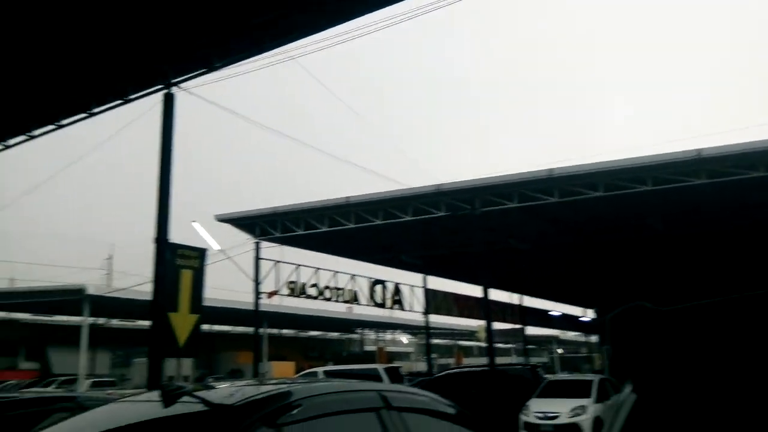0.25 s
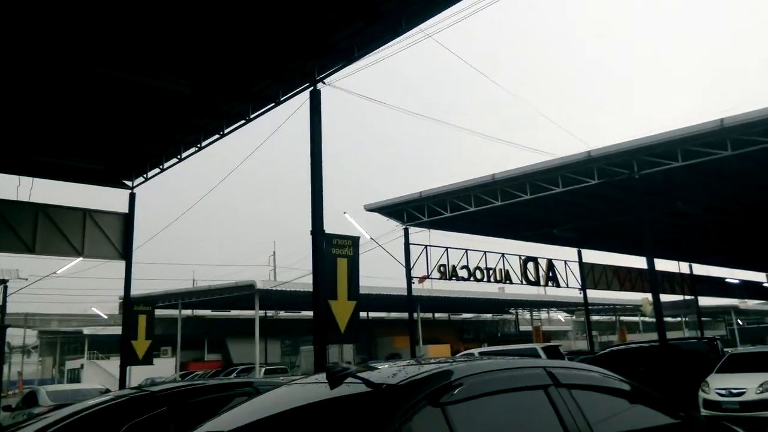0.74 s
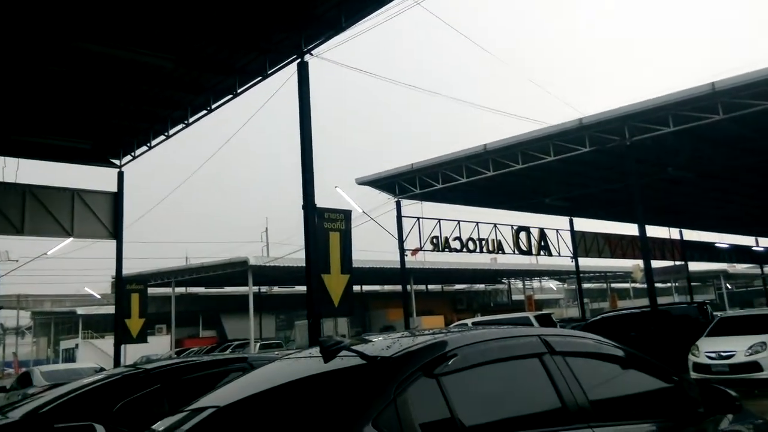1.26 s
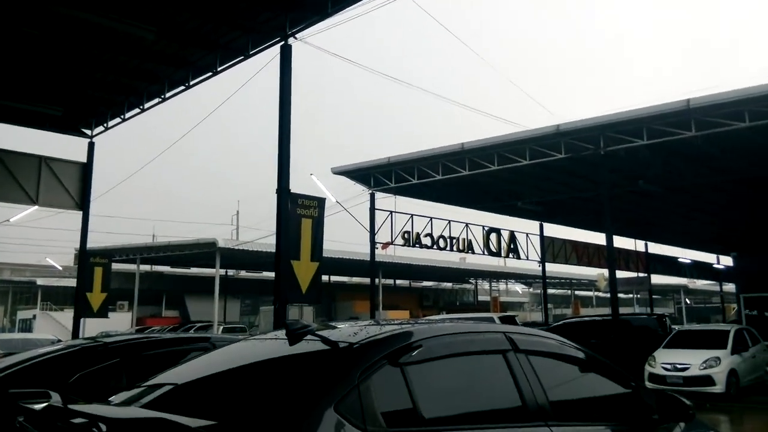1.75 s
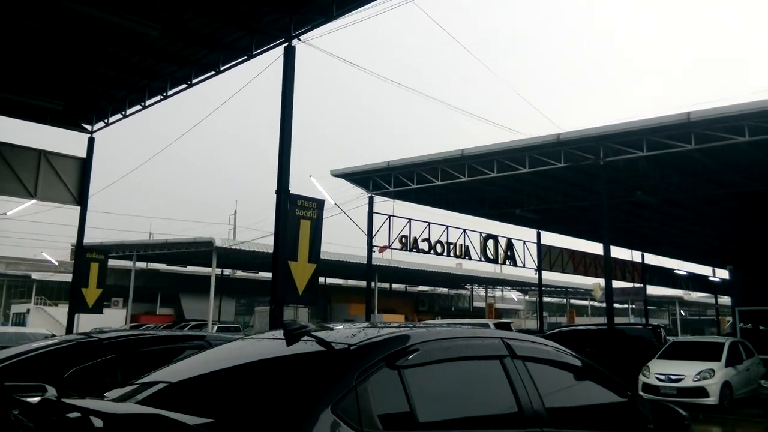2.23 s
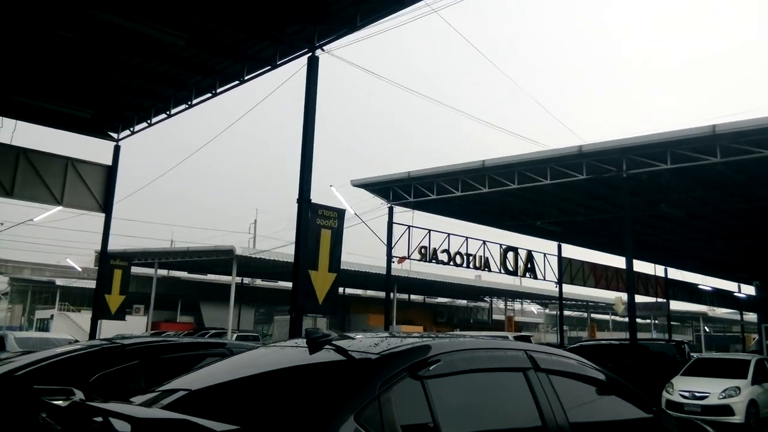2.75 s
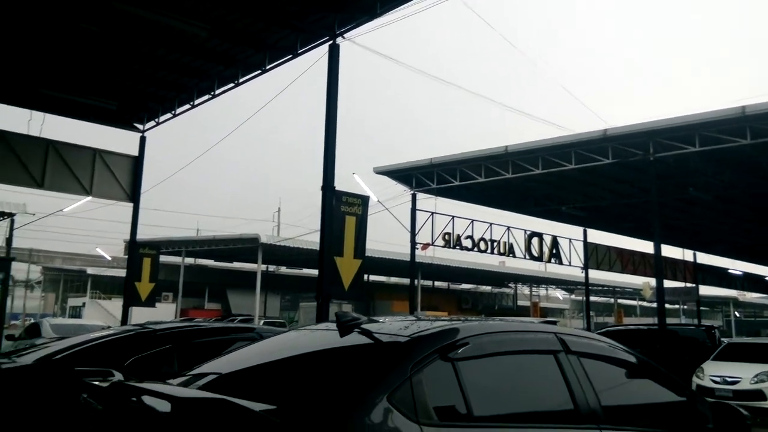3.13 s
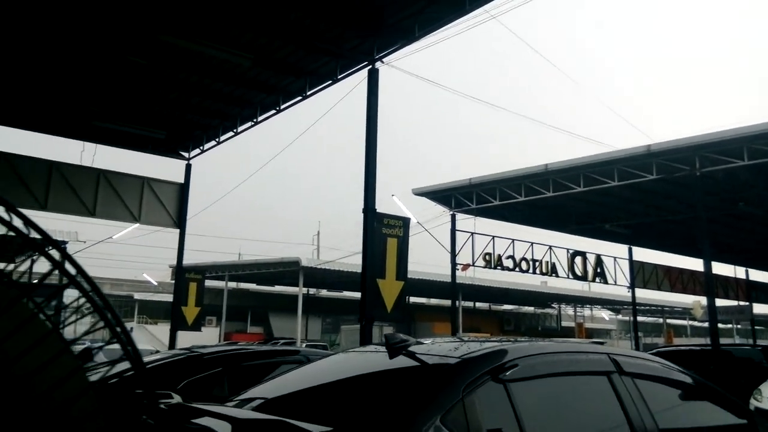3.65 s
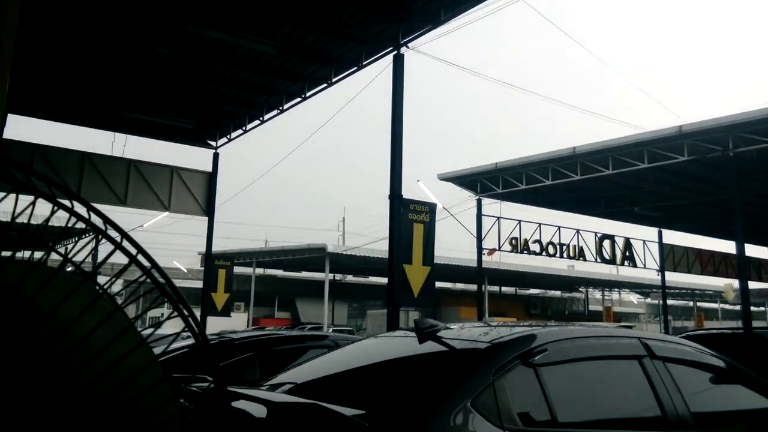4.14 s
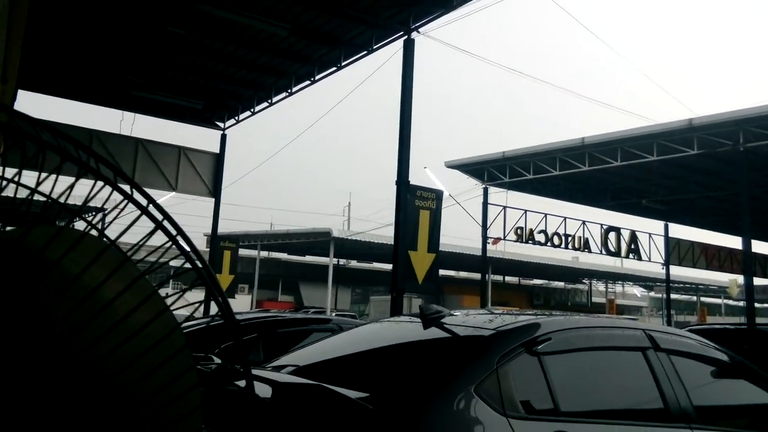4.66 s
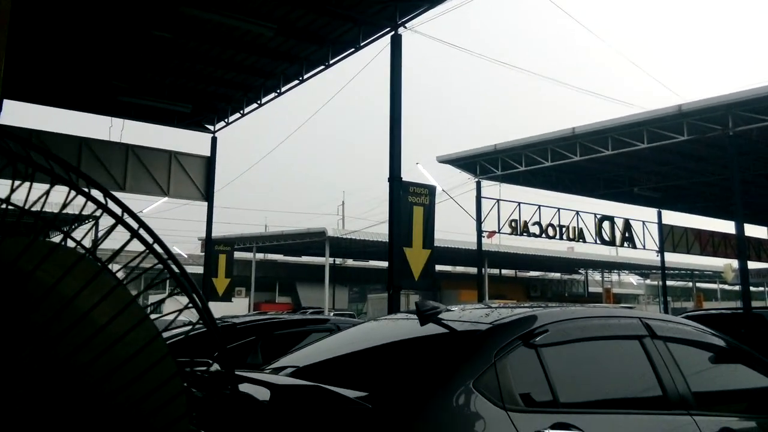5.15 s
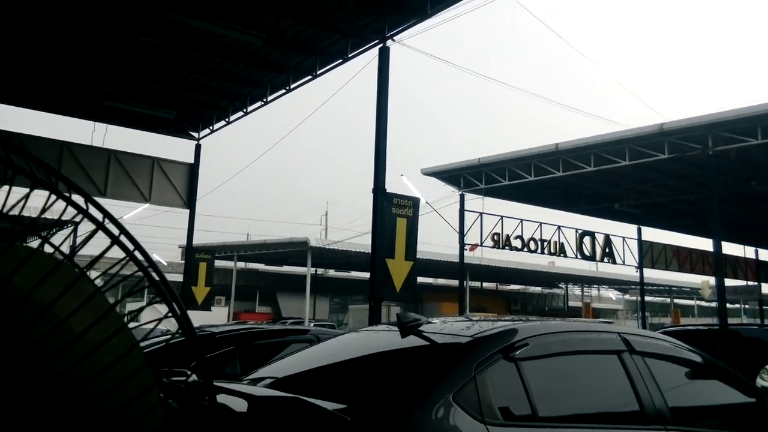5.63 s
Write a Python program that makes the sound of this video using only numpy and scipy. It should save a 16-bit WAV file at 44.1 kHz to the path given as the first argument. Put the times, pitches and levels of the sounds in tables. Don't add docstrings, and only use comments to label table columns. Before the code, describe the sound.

Heavy rain pounds a large sheet-metal canopy over parked cars, heard from beneath. Thousands of drops merge into one dense roar of mid-range drumming, bright metallic ticks and fine hiss. It is already at full strength at the start and continues without a break, with barely noticeable swells. A phone microphone captures it practically in mono, with little deep bass.

```python
import sys
import numpy as np
from scipy import signal
from scipy.fft import rfft, irfft, next_fast_len
from scipy.io import wavfile
from scipy.ndimage import uniform_filter1d

SR = 44100
rng = np.random.default_rng(int(sys.argv[2]) if len(sys.argv) > 2 else 0)


def transcribe(u):
    v = np.clip(np.atleast_2d(u).T, -1, 1)
    q = np.round(v * 32767).astype(np.int16)
    wavfile.write(sys.argv[1], SR, q)


def boost(x):
    u = np.asarray(x, float) / 20
    return 10 ** u


N = 259736
LONG = next_fast_len(N, True)
TIME = np.arange(LONG) / SR
HZ = np.fft.rfftfreq(LONG, 1 / SR)

# time in seconds, level in dB.
SHOWER = [
    (0, .5),
    (.25, 1),
    (.6, 0.27),
    (2, 0.4),
    (3.1, 0.5),
    (3.5, -.3),
    (4.2, 0.05),
    (5.2, -0.63),
    (5.89, -0.35),
]
# frequency in Hz, level in dB per Hz.
ROOF_COLOUR = [(20, -24), (45, -34), (70, -29.5), (130, -14), (180, -12.5), (240, -10), (300, -4),
               (340, -5.5), (470, -5.5), (700, -2), (1000, 0), (1850, -1.25), (2050, -2.5), (3600, -4.5)]
# frequency in Hz, gain in dB.
MIC_PORT = [(3700, 0), (4300, 1.5), (4600, 3), (4900, 5), (5150, 5), (5600, 0), (6200, -5), (6710, -9),
            (6770, -11), (7900, -26)]
# frequency in Hz, gain in dB.
TREBLE_STEPS = [(7900, 0), (9420, -3), (9600, -8.5), (9900, -8.3), (11500, -10), (13600, -12.3),
                (13950, -10.5), (14620, 2), (15470, 2.5), (15600, -40)]
# middle in seconds, low edge in Hz, high edge in Hz,
# level in dB.
EAR_MOMENTS = [
    (.574, 4430, 5850, -5),
    (.666, 13700, 15400, -3.0),
    (.992, 6300, 7700, -1),
    (4.823, 6750, 8350, -5),
    (5.009, 12950, 14600, -8),
]
PANEL_LOW_HZ = [1, 700]

DROPS_PER_S, DROP_SPREAD_DB = 20000, 2.0
DRUM_TOP_HZ, TICK_TOP_HZ = 2770, 7660
CANOPY_T60_S = 0.5
TICK_DB, TICK_FOLLOWS = 1.0, 0.9
SPRAY_DB, SPRAY_FOLLOWS = 0.1, 0.3
LOUDNESS_DB = -23.5
MOMENT_S = 2048 / SR


def colour(x, table):
    hz, db = np.transpose(table)
    gain = boost(np.interp(np.log(HZ + 1), np.log(hz), db))
    return irfft(rfft(x, LONG) * gain, LONG)


def below(edge_hz, order):
    return 1 / (1 + (HZ / edge_hz) ** order)


def between(x, low_hz, high_hz, order):
    power = below(high_hz, order) - below(low_hz, order)
    return irfft(rfft(x) * np.sqrt(np.maximum(power, 0)), LONG)


def flicker(rate_hz):
    hold = int(SR / rate_hz)
    levels = np.repeat(rng.standard_normal(N // 100), hold)[:LONG]
    return uniform_filter1d(uniform_filter1d(levels, hold), hold)


def drops():
    when, size, sign = rng.random((3, LONG))
    landed = when < DROPS_PER_S / SR
    strength = boost(-DROP_SPREAD_DB * np.log(1 - size))
    hits = landed * strength * np.sign(sign - 0.5)
    return hits / hits.std()


def canopy(x):
    echoes = rng.standard_normal(LONG) * boost(-60 * TIME / CANOPY_T60_S)
    smear = np.exp(1j * np.angle(rfft(echoes)))
    return irfft(rfft(x) * smear, LONG)


def spray(shower_db):
    hiss = between(canopy(drops()), TICK_TOP_HZ, SR, order=6)
    return hiss * boost(SPRAY_DB + SPRAY_FOLLOWS * shower_db + 0.76 * flicker(30))


def ticks(shower_db):
    taps = between(canopy(drops()), DRUM_TOP_HZ, TICK_TOP_HZ, order=6)
    return taps * boost(TICK_DB + TICK_FOLLOWS * shower_db + 0.29 * flicker(19))


def drumming(shower_db):
    edges = [*PANEL_LOW_HZ, DRUM_TOP_HZ]
    drum = np.zeros(LONG)
    for low_hz, high_hz in zip(edges, edges[1:]):
        panel = between(canopy(drops()), low_hz, high_hz, order=6)
        drum += panel * boost(0.4 * flicker(24.98))
    return drum * boost(shower_db + 0.26 * flicker(8.2))


def rain():
    shower_db = np.interp(TIME, *np.transpose(SHOWER))
    return colour(spray(shower_db) + ticks(shower_db) + drumming(shower_db), ROOF_COLOUR)


def scene():
    return np.tile(rain()[:N], (2, 1))


def ear_difference(mono):
    phase = np.exp(2j * np.pi * rng.random(len(HZ)))
    other = irfft(abs(rfft(mono)) * phase, LONG)
    difference = np.zeros(LONG)
    for middle_s, low_hz, high_hz, db in EAR_MOMENTS:
        fade = np.cos(np.pi * np.clip((TIME - middle_s) / MOMENT_S, -0.5, 0.5)) ** 2
        difference += boost(db) * fade * between(other, low_hz, high_hz, order=200)
    return difference


def roll_off(x):
    return signal.sosfilt(signal.butter(12, 15600, fs=SR, output="sos"), x)


def record(dry):
    mono = colour(colour(dry[0], MIC_PORT), TREBLE_STEPS)
    mono = mono * boost(LOUDNESS_DB) / mono.std()
    difference = ear_difference(mono)
    mix = np.array([mono + difference, mono - difference])[:, :N]
    return roll_off(mix)


dry = scene()
out = record(dry)
transcribe(out)
```